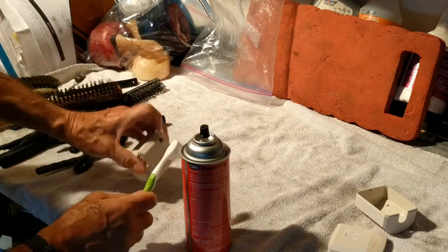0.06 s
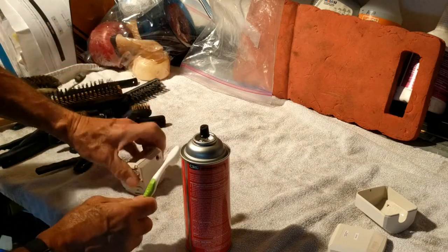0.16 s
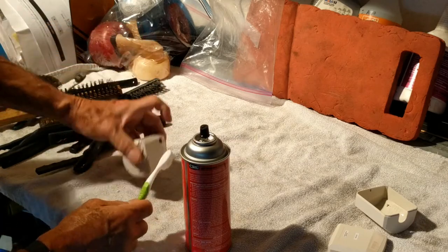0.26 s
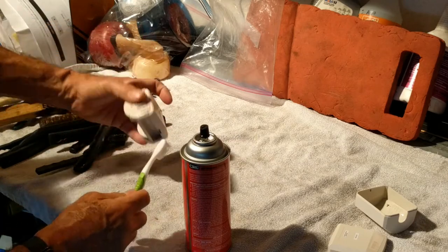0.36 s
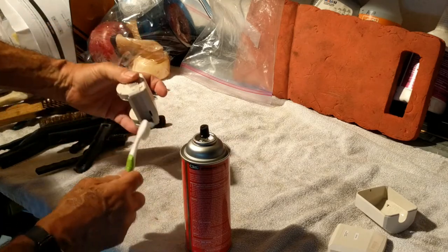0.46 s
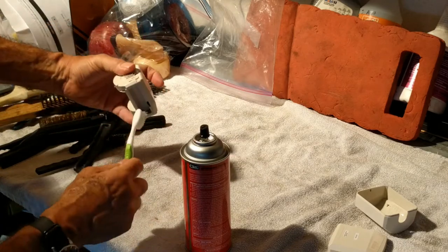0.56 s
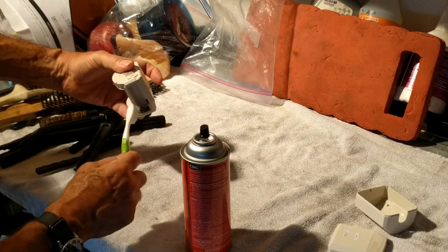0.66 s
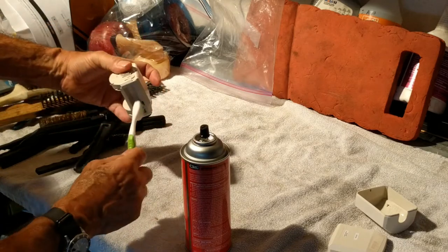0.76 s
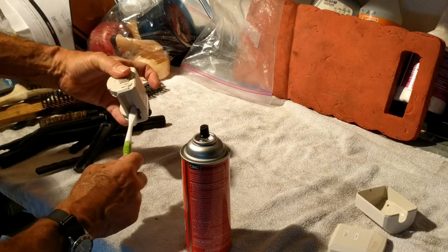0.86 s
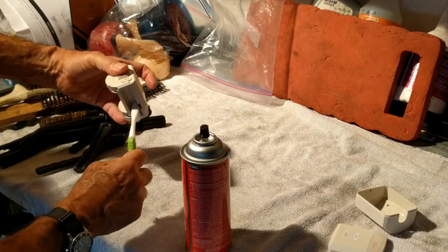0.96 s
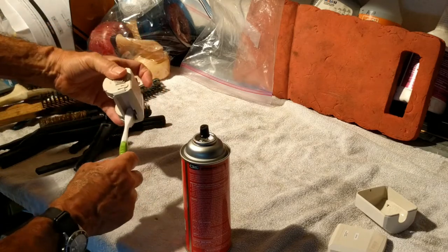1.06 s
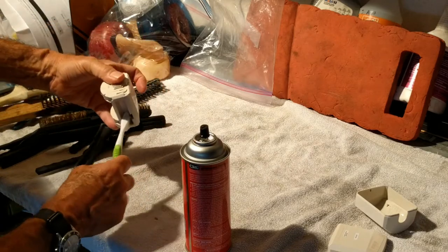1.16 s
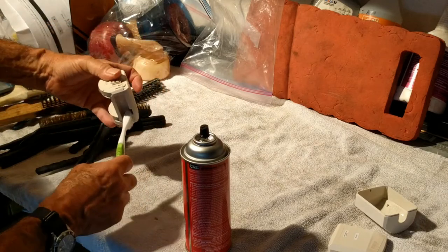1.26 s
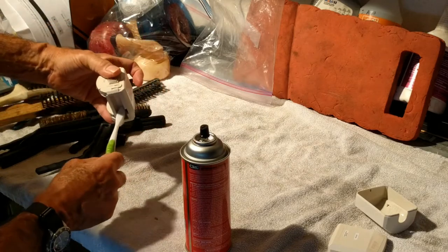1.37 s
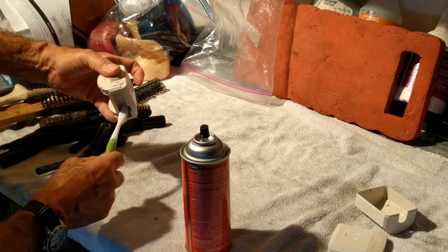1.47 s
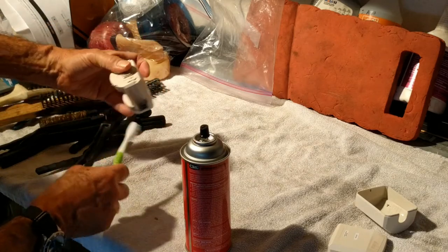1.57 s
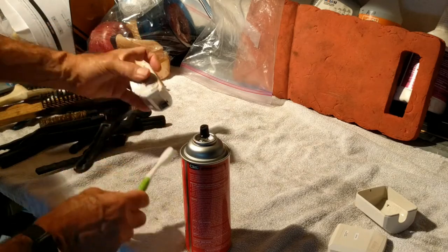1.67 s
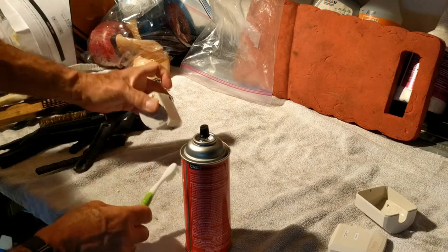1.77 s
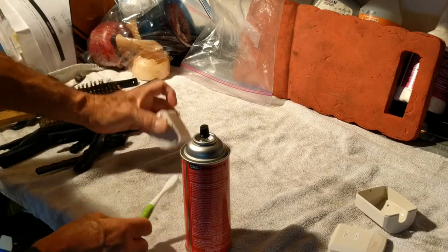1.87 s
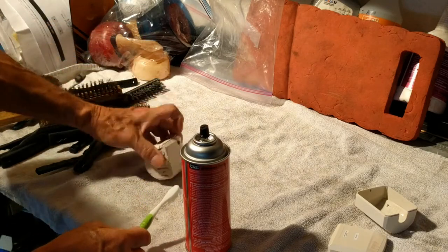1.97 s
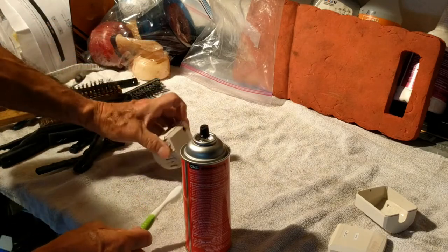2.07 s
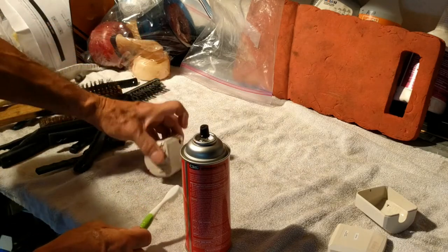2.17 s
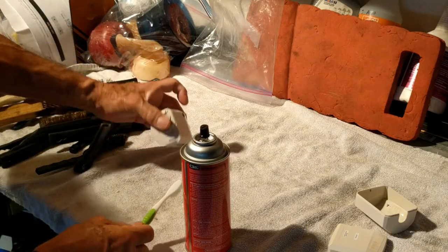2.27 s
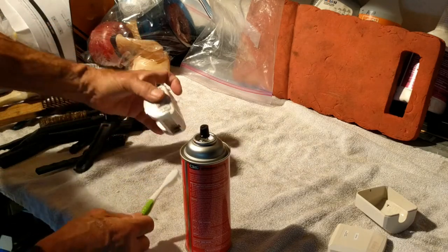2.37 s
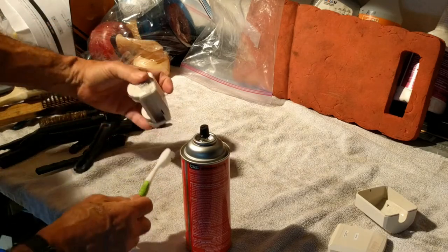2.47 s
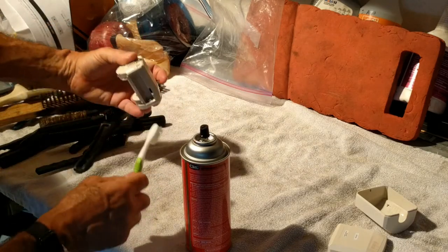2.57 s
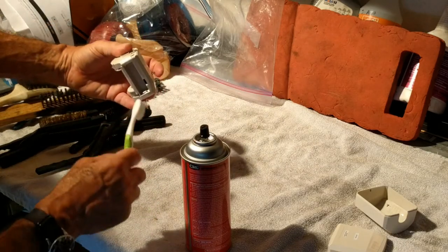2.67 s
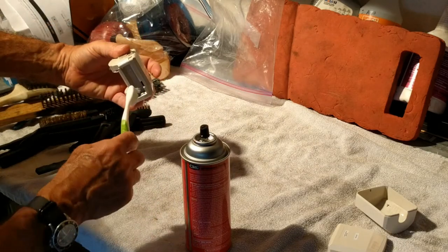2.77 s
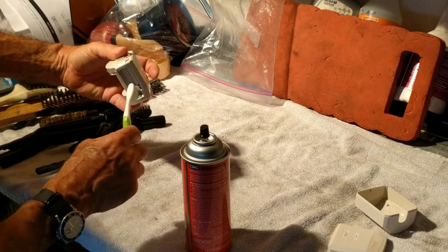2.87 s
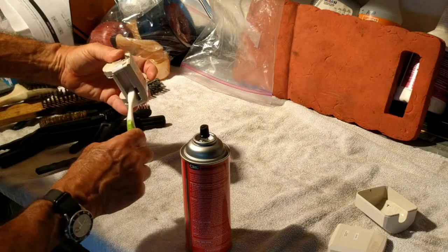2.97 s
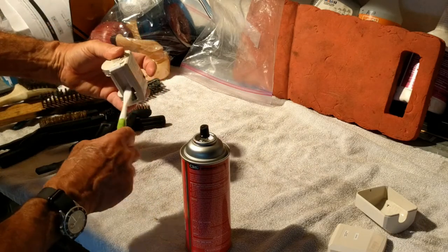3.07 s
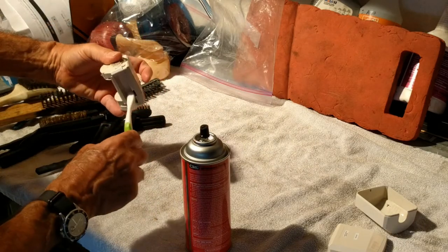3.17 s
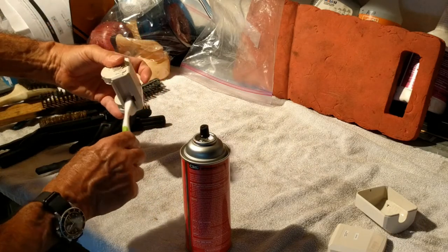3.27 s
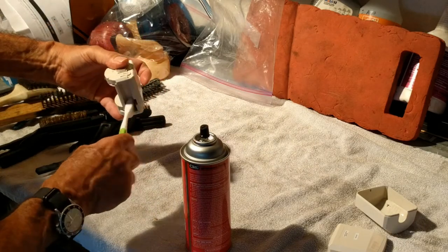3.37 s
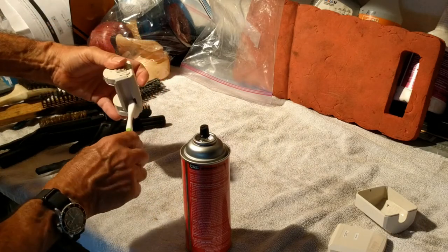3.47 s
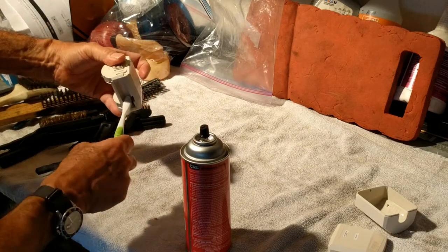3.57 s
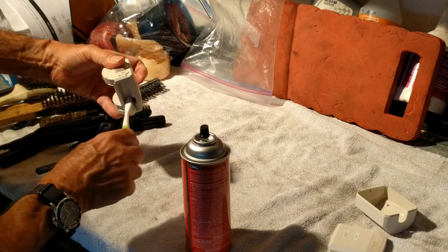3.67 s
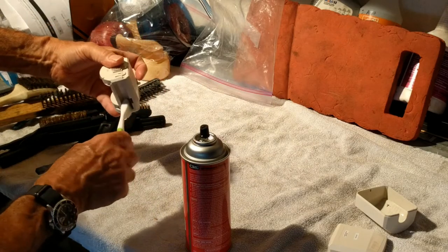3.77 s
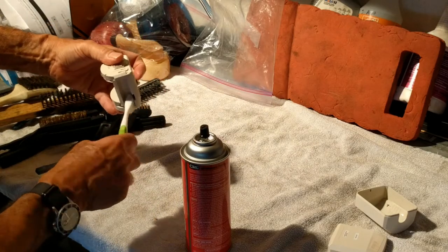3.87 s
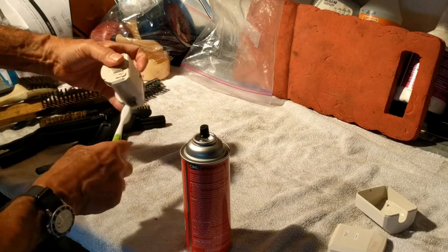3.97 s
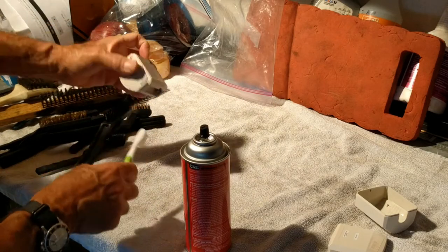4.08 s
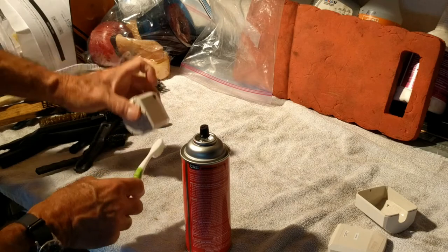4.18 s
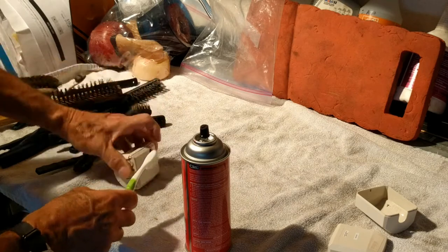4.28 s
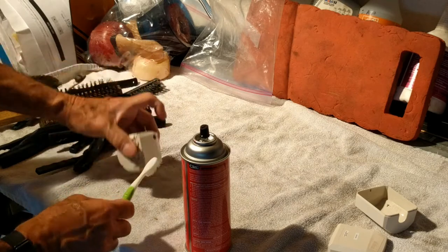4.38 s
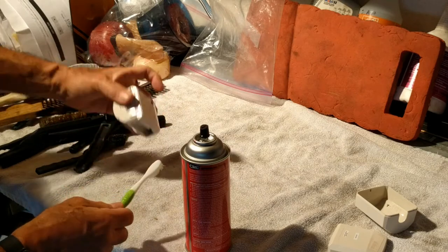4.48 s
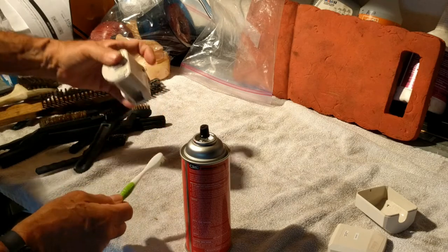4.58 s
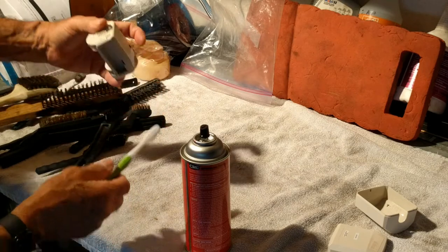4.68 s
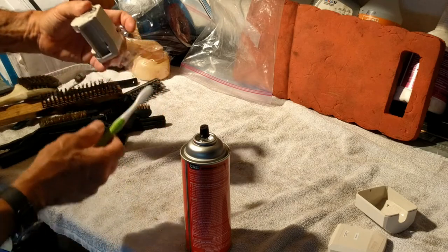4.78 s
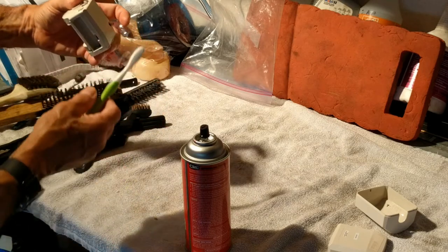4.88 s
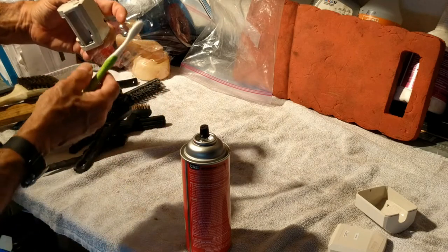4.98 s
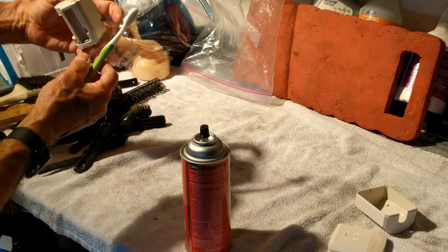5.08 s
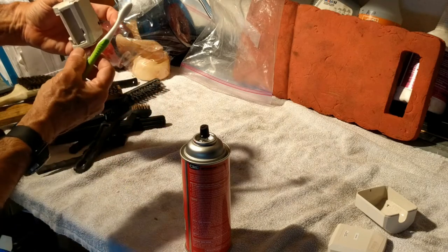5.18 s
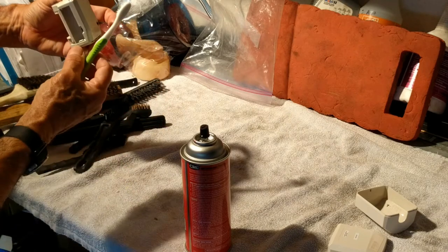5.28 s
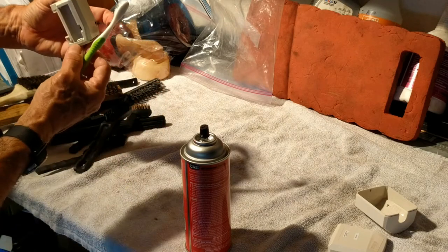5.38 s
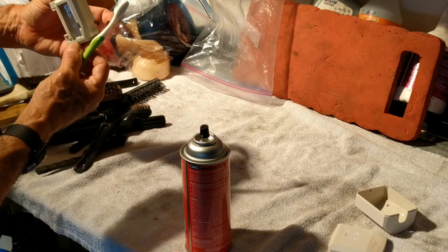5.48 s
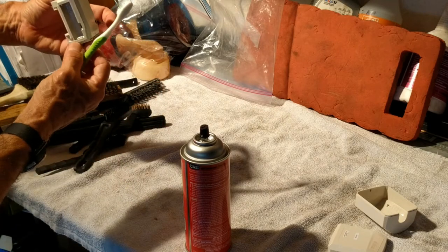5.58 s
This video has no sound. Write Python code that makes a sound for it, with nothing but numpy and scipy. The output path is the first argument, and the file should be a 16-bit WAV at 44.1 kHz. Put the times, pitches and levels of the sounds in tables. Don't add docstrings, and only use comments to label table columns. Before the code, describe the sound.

A close mono microphone hears a workbench in a reverberant workshop, with steady low rumble, faint appliance hum and thin hiss. At 0.1 s a hollow plastic housing knocks loudly on the cloth-covered bench, then more softly at 0.3 s, each with a dull thump, an edge crack and a half-second room tail. Around 0.75 s comes a barely audible finger squeak on plastic. From 0.9 to 1.65 s a toothbrush scrubs inside: short uneven bristle rasps, bright and dry, with hard plastic clacks as its head strikes the walls at each turn. Tiny sharp ticks follow. Knocks return at 2.0 s, loud and flat, and 2.2 s, soft. A quiet gap precedes a denser scrub from 3.0 to 4.1 s, rapid back-and-forth rasps with irregular clacks. One last knock lands at 4.4 s. Until about 5.6 s only faint, high strap-like ticks remain over the hum.

```python
import sys
import numpy as np
from scipy import signal
from scipy.fft import rfft, irfft, next_fast_len
from scipy.io import wavfile
from scipy.ndimage import map_coordinates

SR = 44100
rng = np.random.default_rng(int(sys.argv[2]) if len(sys.argv) > 2 else 0)


def to_wav(s):
    ch = np.atleast_2d(s).T
    pcm = np.round(np.clip(ch, -1, 1) * 32767)
    wavfile.write(sys.argv[1], SR, pcm.astype(np.int16))


def linear_from_db(decibels):
    return 10 ** (np.asarray(decibels, float) / 20)


N = 248724
BLOW_DELAY_S = 0.0006


def unit(x):
    return x / np.sqrt(np.mean(x ** 2) + 1e-20)


def peak(x):
    return x / np.abs(x).max()


def along(points, hz):
    f, v = np.transpose(points)
    return np.interp(np.log(hz + 1), np.log(f + 1), v)


def add(track, s, x):
    part = track[round(s * SR):][:len(x)]
    part += x[:len(part)]


def filtered(x, response):
    m = next_fast_len(len(x) + 4096)
    return irfft(rfft(x, m) * response(np.fft.rfftfreq(m, 1 / SR)), m)[:len(x)]


def band(lo_hz, hi_hz):
    def response(f):
        high_pass = (1j * f / lo_hz / (1 + 1j * f / lo_hz)) ** 2
        return high_pass / (1 + 1j * f / hi_hz) ** 2
    return response


def bell(centre_hz, width_hz):
    return lambda f: 1 / (1 + ((f - centre_hz) / width_hz) ** 2)


def resonances(peaks, scatter_db=0):
    gains = linear_from_db(scatter_db * rng.standard_normal(len(peaks)))

    def response(f):
        total = 0
        for k, (hz, width, db) in enumerate(peaks):
            mode = 1j * f * width / (hz * hz - f * f + 1j * f * width)
            total = total + (-1) ** k * gains[k] * linear_from_db(db) * mode
        return total
    return response


def burst(t60, rise, hard_db=6, hard_t60=0.011):
    t = np.arange(SR // 10) / SR
    grit = rng.standard_normal(len(t)) * linear_from_db(2 * rng.exponential(size=len(t)))
    rattle = linear_from_db(-60 * t / t60)
    hard_touch = linear_from_db(hard_db - 60 * t / hard_t60)
    return grit * (rattle + hard_touch) * (1 - np.exp(-t / rise))


# pitch in Hz, time to fall by 60 dB in seconds.
ROOM_DECAY = [(100, 0.55), (400, 0.46), (1500, 0.41), (5000, 0.46), (10000, 0.49), (16000, 0.23)]


def room(blow, tone, swell):
    hz, t, z = signal.stft(rng.standard_normal(SR * 2 // 3), SR, nperseg=768)
    decay = linear_from_db(-60 * t / along(ROOM_DECAY, hz)[:, None])
    shape = np.abs(tone(hz))[:, None] * decay * (1 - np.exp(-(t / swell) ** 2))
    tail = signal.istft(z * shape, SR, nperseg=768)[1]
    return tail * np.linalg.norm(blow) / np.linalg.norm(tail)


# pitch in Hz, level in dB per Hz.
FLOOR = [(15, -41), (25, -12), (53, 10.5), (114, 0.5), (150, -7), (358, -14), (410, -15), (538, -14.5),
         (1030, -20), (1220, -20.5), (1680, -22.5), (2330, -24.5), (13300, -26), (15200, -19.5),
         (16500, -53)]
# pitch in Hz, level in dB rms, width in Hz.
HUM = [
    (65, -74, 15),
    (127, -69, 8),
    (267.4, -74, 8),
    (548, -75.5, 8),
    (10500, -75.5, 600),
    (13800, -75, 1300),
]


def background():
    out = linear_from_db(-57) * unit(filtered(rng.standard_normal(N), lambda f: linear_from_db(along(FLOOR, f))))
    for hz, db, width in HUM:
        out += linear_from_db(db) * unit(filtered(rng.standard_normal(N), bell(hz, width)))
    return out


# start in seconds, stop in seconds, pitch in Hz, level in dB.
CREAK = (0.73, 0.88, 652.5, -72)


def creak():
    start, stop, hz, db = CREAK
    t = np.arange(N) / SR
    squeak = unit(filtered(rng.standard_normal(N), bell(hz, 15)))
    return linear_from_db(db) * squeak * np.sin(np.pi * np.clip((t - start) / (stop - start), 0, 1))


# start in seconds, peak in dB, low part in dB.
TICKS = [(0.2086, -29.5, -0.5), (0.7304, -36, -16), (0.7831, -44, -22.5), (1.4731, -24, -20),
         (1.6322, -20.5, -27), (1.7906, -23.5, -20.5), (2.3226, -31.5, -18), (2.8504, -35, -31),
         (2.9056, -41, -25), (3.436, -73, 13), (4.2046, -37.5, -25), (4.4941, -35, -20), (4.5123, -37, -18),
         (4.5497, -39.5, -14), (4.817, -45, -18), (4.8524, -54.5, 3), (5.08, -34.5, -23),
         (5.1259, -37.5, -25), (5.33, -51, 6), (5.3377, -52.5, -4), (5.4331, -41.5, -22.5),
         (5.6093, -37, -27)]


def ticks():
    out = np.zeros(N)
    bright = lambda f: band(8500, 30000)(f) ** 3
    low = lambda f: band(3500, 6000)(f) ** 2
    for s, db, low_db in TICKS:
        snap = burst(0.011, 0.0001, hard_db=-4.5, hard_t60=0.0074)
        blow = linear_from_db(db) * (peak(filtered(snap, bright)) + linear_from_db(low_db) * peak(filtered(snap, low)))
        add(out, s, blow)
        add(out, s, linear_from_db(-18) * room(blow, bright, swell=0.009))
    return out


# pitch in Hz, width in Hz, level in dB.
WALLS = [(2410, 240, -7), (3060, 67, -1.5), (3900, 1100, -24), (4700, 89, -23.5), (5220, 260, -15),
         (6750, 144, -41.5), (7850, 540, -22.5)]
# pitch in Hz, width in Hz, level in dB.
CAVITY = [(1138, 51, 14), (1320, 52, -9), (1274, 76, 5), (1576, 320, -1.5)]
# start in seconds, stop in seconds, rasp in dB, fizz above the rasp in dB.
STROKES = [(0.89, 0.899, -41.5, -5), (0.900, 0.929, -41, -4.5), (1.02, 1.073, -44.5, -2),
           (1.088, 1.127, -44.5, -1.5), (1.16, 1.235, -48.5, 3), (1.269, 1.272, -43.5, 7.5),
           (1.346, 1.426, -41, 1), (1.438, 1.53, -47.5, 1.5), (1.599, 1.663, -40.5, 5),
           (3.076, 3.115, -47, 1), (3.138, 3.16, -40.5, -1), (3.175, 3.217, -56, 12), (3.252, 3.3, -52, -4),
           (3.342, 3.408, -45.5, 1.5), (3.439, 3.482, -44, -2.5), (3.535, 3.579, -42.5, 1),
           (3.598, 3.682, -50, 6), (3.677, 3.731, -43, 0.5), (3.806, 3.842, -47.5, 3.5),
           (3.857, 3.93, -49, 5), (3.958, 4.002, -45.5, 2), (4.023, 4.091, -38, 1)]


def bristles():
    out, cavity = np.zeros(N), resonances(CAVITY)
    for start, stop, rasp_db, fizz_db in STROKES:
        length = stop - start
        centre_hz = 4120 + 15300 * length
        t = np.arange(round((length + 0.03) * SR)) / SR
        flicks = rng.standard_normal(SR // 6) * linear_from_db(1.8 * rng.exponential(size=SR // 6))
        flicks = flicks[:len(t)]
        places = np.meshgrid([0, 1], np.arange(len(t)) / 250, indexing="ij")
        clumps = map_coordinates(rng.standard_normal((2, 40)), places)
        swell = np.minimum(t / length, 1) ** 0.68
        drag = swell * linear_from_db(-60 * np.maximum(t - length, 0) / 0.04)
        walls, rasp = resonances(WALLS, scatter_db=7.5), resonances([(centre_hz, 1500, 0)])
        housing = lambda f: rasp(f) + 0.68 * walls(f) + 0.37 * cavity(f)
        body = unit(filtered(flicks, lambda f: housing(f) * band(900, 9000)(f) ** 2))
        fizz = unit(filtered(flicks, lambda f: band(6000, 25000)(f) ** 2))
        body_gain = linear_from_db(rasp_db + 4.6 * clumps[0])
        fizz_gain = linear_from_db(rasp_db + fizz_db + 0.87 * clumps.sum(axis=0))
        add(out, start, drag * (body_gain * body + fizz_gain * fizz))
    tail = room(np.ones(1), np.ones_like, swell=0.011)
    return out + linear_from_db(-10.5) * signal.fftconvolve(out, tail)[:N]


# start in seconds, peak in dB, cavity in dB, treble in dB,
# pitch of the wall ringing most in Hz.
CLACKS = [(0.8934, -13.5, -21.5, -15, 3950), (0.9247, -20, -5.5, -24, 4000),
          (0.9303, -8.5, -47, -21.5, 3060), (1.11, -13.5, -8, -1, 3080), (1.272, -15.5, -4, -1, 3130),
          (1.4177, -18.5, -3, -21, 2352), (1.4317, -15.5, -10, 3, 5550), (1.5799, -12.5, -7.5, -5.5, 5240),
          (1.646, -25.5, 2.5, 5.5, 4585), (3.0218, -12.5, -15.5, -15, 3250), (3.0452, -17, -24, -24, 2460),
          (3.1085, -16.5, -27, -14.5, 3720), (3.1529, -12, -10.5, -7, 3200), (3.2308, -22, -4, -6.5, 3814),
          (3.2348, -20.5, -26, 9.5, 2600), (3.3134, -11.5, -7.5, -27, 3900), (3.467, -19, -11, -16.5, 3630),
          (3.4721, -14, -27, -34, 4200), (3.5591, -23, -32, -10.5, 4000), (3.655, -9, -7.5, -17, 5340),
          (3.7476, -14.5, -10.5, -31.5, 3900), (4.0125, -19, -9.5, 5.5, 3940),
          (4.0195, -22.5, -3, -6, 2400), (4.0891, -24.5, -11, 7, 8200)]
# start in seconds, peak in dB, pitch of that wall in Hz.
GRAZES = [(1.2445, -36, 2220), (1.5403, -22.5, 2760), (1.5682, -24, 4390), (1.6625, -34, 3100),
          (3.2714, -34.5, 2350), (3.2847, -25, 4560), (3.3084, -24, 2570), (3.4012, -28, 2350),
          (3.5767, -27.5, 4470), (3.6024, -37, 5400), (3.6414, -24.5, 4020), (3.8372, -27, 3040),
          (3.8764, -38, 4400), (3.9604, -43, 5150), (3.9836, -26, 4160)]


def clacks():
    out = np.zeros(N)
    clack_t60, graze_t60 = 0.054, 0.064
    graze_cavity_db, graze_treble_db = -10, -13
    hits = [(*row, clack_t60) for row in CLACKS]
    hits += [(s, db, graze_cavity_db, graze_treble_db, hz, graze_t60) for s, db, hz in GRAZES]
    for s, db, cavity_db, treble_db, wall_hz, t60 in sorted(hits):
        contact = burst(t60, 0.00018, hard_db=5, hard_t60=0.013)
        walls, struck = resonances(WALLS, scatter_db=3), resonances([(wall_hz, 300, 0)])
        cavity = resonances(CAVITY, scatter_db=2)
        parts = [lambda f: walls(f) + struck(f) + 0.36 * band(1800, 8000)(f),
                 lambda f: cavity(f) * band(800, 4000)(f),
                 band(4100, 22000)]
        levels = linear_from_db([db, db + cavity_db, db + treble_db - 2])
        gains = [level / np.abs(filtered(contact, part)).max() for level, part in zip(levels, parts)]

        def tone(f):
            mix = sum(gain * part(f) for gain, part in zip(gains, parts))
            return mix * band(800, 60000)(f) ** 2

        room_tone = lambda f: np.abs(tone(f)) + 0.5 * gains[1] * np.abs(parts[1](f))
        blow = filtered(contact, tone)
        add(out, s + BLOW_DELAY_S, blow)
        add(out, s, linear_from_db(-7.5) * room(blow, room_tone, swell=0.0044))
    return out


# start in seconds, peak in dB, edge crack in dB.
KNOCKS = [
    (0.091, -8.5, -13),
    (0.278, -13, -12),
    (2.028, -10.5, -15.5),
    (2.224, -16, -20),
    (4.375, -12.5, -16),
]
# pitch in Hz, level in dB, time to fall by 60 dB in seconds.
STRUCK = [(237, -3, 0.03), (383.3, -18, 0.2), (452, -4.5, 0.035), (589, 3, 0.063), (715, -11, 0.075),
          (860, -2, 0.057), (1124, 2.5, 0.032), (1365, 7, 0.024), (1655, -3.5, 0.043), (2252, -0.5, 0.029),
          (2857, -12, 0.046)]
# pitch in Hz, level in dB, time to fall by 60 dB in seconds.
BENCH = [(103.4, 6, 0.067), (78, -5, 0.045)]
# pitch in Hz, level in dB per Hz.
KNOCK_TONE = [(71, -33.5), (120, -0.5), (209, -4), (370, -6), (410, 0), (874, -7.5), (1900, -8),
              (2110, -12.5), (9990, -27), (14700, -34.5), (16000, -48)]
# pitch in Hz, width in Hz, level in dB.
BOOM = [(260, 30, 1.5), (385, 30, 0.5), (486, 35, 3), (589, 40, 2.5), (710, 72, -3), (865, 71, 4),
        (1024, 70, 2), (1140, 70, 0.5), (1324, 70, 0)]


def knocks():
    out, t = np.zeros(N), np.arange(SR // 5) / SR
    for s, db, crack_db in KNOCKS:
        edge_db = crack_db + 15
        thump_db = -13.5 - 0.7 * edge_db
        upper_db = -2 + 0.91 * edge_db
        room_db = 1.5 + 0.25 * edge_db

        ring = np.zeros(len(t))
        for k, (hz, level, t60) in enumerate(STRUCK):
            scatter_db = rng.normal(0, 1.5)
            fade = linear_from_db(level + scatter_db + upper_db * (hz > 1000) - 60 * t / t60)
            ring += fade * np.sin(2 * np.pi * hz * t + 0.4 * scatter_db * k)
        shell = peak(ring * (1 - np.exp(-(t / 0.0011) ** 2)))
        crack = peak(filtered(burst(0.059, 0.0006), band(1400, 7300)))
        add(shell, 0, linear_from_db(crack_db + 14.5) * crack)
        small_modes = peak(filtered(burst(0.075, 0.0013, hard_db=-23.5), band(353, 2100)))
        add(shell, 0, linear_from_db(-8) * small_modes)

        thump = sum(linear_from_db(level - 60 * t / t60) * np.sin(2 * np.pi * hz * t) for hz, level, t60 in BENCH)
        thump = thump * (1 - np.exp(-t / 0.0053))
        add(out, s + BLOW_DELAY_S, linear_from_db(db) * (shell + linear_from_db(thump_db) * thump))

        def tone(f):
            treble_db = 1.6 * (crack_db + 19) / (1 + (2500 / (f + 1)) ** 2)
            return linear_from_db(along(KNOCK_TONE, f) + treble_db)

        tail = room(shell, tone, swell=0.035)
        boom = resonances(BOOM, scatter_db=1.5)
        tail = filtered(tail, lambda f: 0.85 + np.abs(boom(f)))
        add(out, s, linear_from_db(db + room_db - 9) * tail)
    return out


def scene():
    return (knocks() + clacks() + bristles() + ticks() + creak() + background())[None]


def roll_off(x):
    return signal.sosfilt(signal.butter(12, 16640, fs=SR, output="sos"), x)


def record(dry):
    def colour(f):
        shelf = np.where(f < 15380, 1, linear_from_db(-32))
        return band(52, 60000)(f) * shelf * (f < 16600)
    mix = filtered(dry[0], colour)[None]
    return roll_off(mix)


dry = scene()
out = record(dry)
to_wav(out)
```